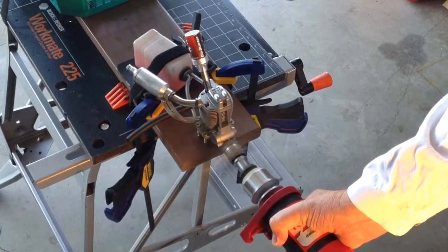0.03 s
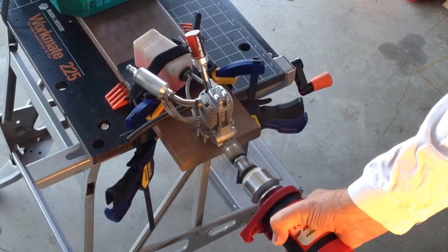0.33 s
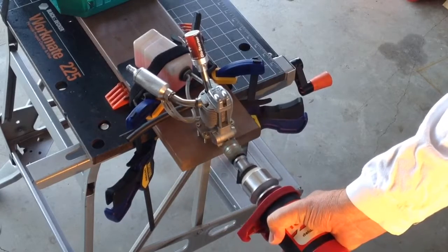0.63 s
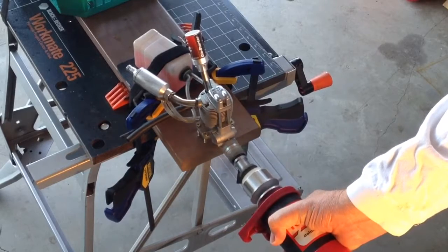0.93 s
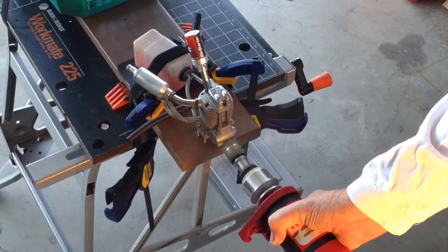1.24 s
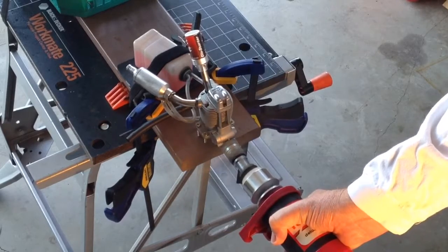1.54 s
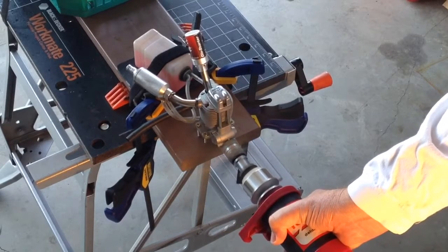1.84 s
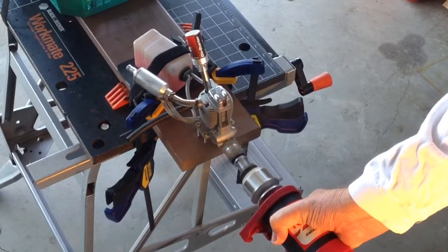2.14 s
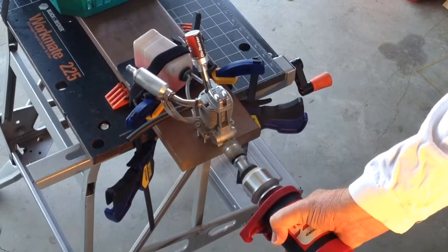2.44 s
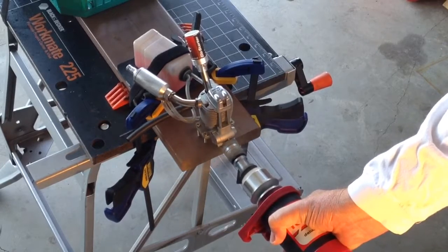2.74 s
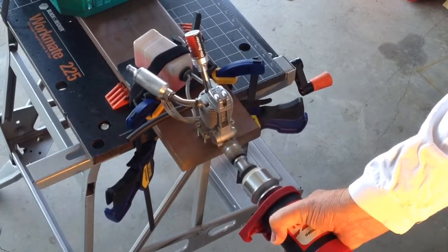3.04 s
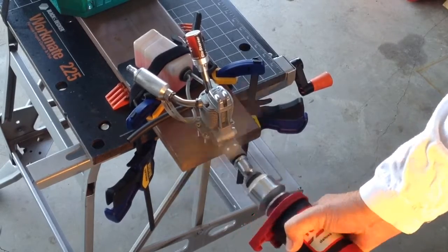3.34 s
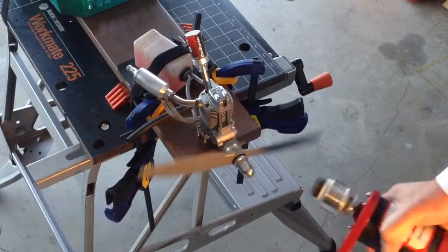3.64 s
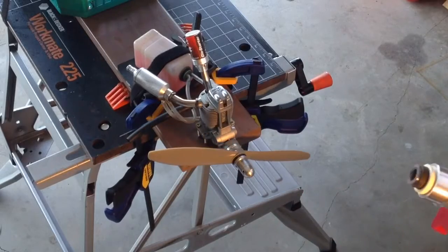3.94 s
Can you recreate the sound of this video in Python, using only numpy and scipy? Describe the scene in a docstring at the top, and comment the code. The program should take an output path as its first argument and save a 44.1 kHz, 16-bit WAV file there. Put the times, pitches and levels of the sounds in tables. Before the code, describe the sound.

An electric starter cranks a small model engine with harsh rattling and squeaks, then it stops.

```python
"""An electric starter cranks a small four-stroke model engine clamped to a workbench; it never fires.
Every cycle thumps the bench, rattles gears and valves, and makes the starter's cone slip and squeak.
The starter is pulled off and the propeller coasts to rest with slowing clacks, a wheeze and a clink.
One microphone, close enough to catch the propeller wash, hears it all over the rumble of a workshop."""
import sys
import numpy as np
from scipy import signal
from scipy.fft import rfft, irfft
from scipy.io import wavfile
from scipy.ndimage import uniform_filter1d, map_coordinates

SR = 44100
rng = np.random.default_rng(int(sys.argv[2]) if len(sys.argv) > 2 else 0)


def wav_out(sig):
    """Save sig, one row per channel (or a flat mono array), as 16-bit PCM at SR to the path in sys.argv[1]."""
    wavfile.write(sys.argv[1], SR, np.round(np.clip(np.atleast_2d(sig).T, -1, 1) * 32767).astype(np.int16))


N = 176400
T = np.arange(N) / SR
CRANKING_HZ, RELEASE_S = 24.2, 3.29  # nominal engine cycles per second; the starter comes off


def amp(db):
    """Decibels to gain."""
    return 10 ** (np.asarray(db) / 20)


def unit(x):
    """Scales to rms 1."""
    return x / np.sqrt(np.mean(x ** 2) + 1e-20)


def read(points, hz):
    """Reads a table on a log-frequency axis."""
    f, value = np.transpose(points)
    return np.interp(np.log(hz + 1), np.log(f), value)


def colour(x, points):
    """Gives x a spectrum that falls away below its first point; rms 1."""
    hz = np.fft.rfftfreq(2 * len(x), 1 / SR)
    gain = amp(read(points, hz)) * np.minimum(hz / points[0][0], 1) ** 2
    return unit(irfft(rfft(x, 2 * len(x)) * gain)[:len(x)])


def add(mix, start_s, sound):
    """Mixes a sound in at start_s."""
    part = mix[max(round(start_s * SR), 0):][:len(sound)]
    part += sound[:len(part)]


def jitter(size, length=N):
    """Noise smoothed over size samples; rms 1."""
    return unit(uniform_filter1d(rng.standard_normal(length), size))


def grains(spread_db):
    """Noise whose level jumps from one tiny impact to the next."""
    return rng.standard_normal(N) * amp(spread_db * jitter(24))


def passes(cycles, phase):
    """Samples at which the engine passes a phase (0-1) of its cycle."""
    return np.flatnonzero(np.diff(np.floor(cycles - phase)) > 0)


def ring(modes, t, wave=np.sin):
    """The decaying modes of a struck body."""
    return sum(amp(db - 60 * t / t60) * wave(2 * np.pi * hz * t) for hz, db, t60 in modes)


# Room tone of the workshop: frequency_hz, level_db
ROOM_TONE = [(20, -22), (60, -11), (115, 5), (200, -16.5), (400, -19.5), (1000, -27), (4000, -27.5),
             (8000, -32), (15000, -36)]
def room_tone():
    """A steady low rumble behind the bench."""
    return amp(-54) * colour(rng.standard_normal(N), ROOM_TONE)


# Reverberation of the workshop: frequency_hz, t60_s
ROOM_DECAY = [(150, .4), (1000, .42), (4000, .36), (9000, .22), (15000, .17)]
def room_echo(x):
    """A short diffuse tail whose treble dies first."""
    hz, t, spectra = signal.stft(rng.standard_normal(SR // 2), SR, nperseg=256)
    tail = signal.istft(spectra * amp(-60 * t / read(ROOM_DECAY, hz)[:, None]), SR, nperseg=256)[1]
    return signal.oaconvolve(x, tail / np.linalg.norm(tail))[:N]


# Gusts reaching the microphone: peak_s, level_db
GUSTS = [(.705, -46), (1.44, -61.5), (2.02, -50), (2.35, -50.5), (2.8, -51)]
# Wind noise on the microphone: frequency_hz, level_db
BUFFET = [(25, -15), (45, 2), (75, -4.5), (130, -11), (400, -73)]
def propeller_wash(effort):
    """Air off the propeller buffets the microphone, with a few brief gusts."""
    gusts = sum(amp(db) * np.exp(-((T - s) / .018) ** 2) for s, db in GUSTS)
    return (amp(-64.5) * effort + gusts) * colour(rng.standard_normal(N), BUFFET)


# Breath of the cylinder: frequency_hz, level_db
WHEEZE = [(300, -8), (1100, 5), (2400, -6), (3500, 5.5), (4300, -1), (5200, -17), (15000, -39.5)]
def wheeze(peak_s=3.68, width_s=.043):
    """The cylinder lets out one last wheeze as the propeller stops."""
    swell = amp(-58.5) / (1 + ((T - peak_s) / width_s) ** 2)
    return swell * colour(rng.standard_normal(N), WHEEZE)


# Modes of the clink: pitch_hz, level_db, t60_s
CLINK_MODES = [(880, -45, .059), (2750, -39, .04), (3420, -45, .055)]
def clink(start_s=3.7, rise_s=.0035):
    """A soft metallic touch as the propeller turns over one last time."""
    t = np.maximum(T - start_s, 0)
    return (1 - np.exp(-t / rise_s)) * ring(CLINK_MODES, t)


# Valve clacks while coasting: start_s, level_db
CLACKS = [(3.2868, -30), (3.331, -22.5), (3.3842, -23.5), (3.4457, -32), (3.4543, -24), (3.5627, -28.5),
          (3.5791, -28.5), (3.6143, -32), (3.7812, -33.5)]
# Noise of one clack: frequency_hz, level_db
CLACK_SPECTRUM = [(300, -1), (1400, 1), (2100, 3), (3000, -2), (5000, -4), (9000, -1), (14500, -1),
                  (16000, -9)]
# Crankcase modes: pitch_hz, level_db, t60_s
CASE_MODES = [(2040, -18, 0.14), (2450, -29, 0.13), (3420, -31, 0.065)]
def valve_clacks(decay_s=.0045):
    """Separate valve clacks ring the crankcase as the engine runs down."""
    out, t = np.zeros(N), T[:SR // 5]
    for start_s, db in CLACKS:
        click = np.exp(-t / decay_s) * colour(rng.standard_normal(len(t)), CLACK_SPECTRUM)
        add(out, start_s, amp(db - 4) * (click + ring(CASE_MODES, t)))
    return out


# Gear tones: multiple_of_cycle_rate
GEAR_ORDERS = [13, 25, 29, 32, 35, 36, 37, 38]
# Housing resonances: centre_hz, width_hz, level_db
HOUSING = [(318, 22, -50), (680, 300, -53), (899, 18, -42.5)]
def gear_whine(cycles, speed):
    """Gear tones locked to the crank swell in the housing resonances and throb twice a cycle."""
    out, knots = np.zeros(N), np.arange(0, T[-1] + .1, .1)
    for order in GEAR_ORDERS:
        pitch_hz = order * speed
        power = sum(amp(db) ** 2 / (1 + (2 * (pitch_hz - hz) / width) ** 2) for hz, width, db in HOUSING)
        waver = np.interp(T, knots, .2 * rng.standard_normal(len(knots)))
        out += np.sqrt(2 * power) * (1 + waver) * np.sin(2 * np.pi * (order * cycles + rng.random()))
    throb = 1 + .5 * np.cos(2 * np.pi * 2 * (cycles - .2))
    return out * (speed / CRANKING_HZ) ** 1.4 * throb


# Drifting pitch of the starter's slipping cone: time_s, pitch_hz
SLIP_PITCH = [(0.0, 9980), (0.53, 10130), (0.57, 9500), (0.71, 10170), (0.78, 9300), (1.11, 9790),
              (1.81, 9130), (1.84, 8520), (2.04, 9800), (2.16, 8920), (2.51, 9440), (2.78, 8040),
              (3.1, 10030), (3.3, 8200)]
# Resonance of the cone: frequency_hz, gain_db
CONE_RESONANCE = [(6500, -47.5), (7800, -14), (8500, -3.5), (10300, -6), (11300, -7), (13000, -7)]
def cone_scrape(sweep_hz=3370, rough_hz=605.5, let_go_s=.02):
    """The cone rubs the spinner in rough rising chirps, about one per crank turn, until pulled off."""
    contact = np.clip((RELEASE_S - T) / let_go_s + .5, 0, 1)
    wander = .37 * uniform_filter1d(jitter(2500), size=900)
    turn = (2 * CRANKING_HZ * T + wander) % 1
    hz = np.interp(T, *np.transpose(SLIP_PITCH)) + sweep_hz * (turn - .5) + rough_hz * jitter(14)
    grip = amp(1.5 * jitter(200))
    chirps = np.sin(np.pi * turn) * grip * np.sin(2 * np.pi * np.cumsum(hz) / SR)
    return amp(-34) * contact * colour(chirps, CONE_RESONANCE)


def squeak(peak_s, db, hz, width_s=.0018, sag_hz_per_s=209000, wobble_hz=640):
    """Stick and slip makes a tiny, rough, falling whistle; returns its start time and sound."""
    t = T[:SR // 80] - T[SR // 160]
    pitch_hz = hz - sag_hz_per_s * t + wobble_hz * jitter(14, len(t))
    envelope = amp(db) / np.cosh(2 * t / width_s)
    return peak_s + t[0], envelope * np.sin(2 * np.pi * np.cumsum(pitch_hz) / SR)


# Loudest squeaks of the cone: time_s, level_db, pitch_hz
LOUD_SQUEAKS = [(0.3074, -10.5, 9500), (0.5823, -9.5, 8800), (0.7077, -7, 10200), (0.7926, -8.5, 8890),
                (0.8335, -13, 8900), (0.874, -10.5, 9150), (0.9153, -21, 8940), (1.038, -9, 10100),
                (1.0785, -11, 10400), (1.099, -13, 9640), (1.2022, -10.5, 9350), (1.243, -7, 9860),
                (1.2838, -6.5, 10100), (1.3256, -6, 9770), (1.367, -3.5, 8720), (1.5522, -8, 9630),
                (1.7379, -12, 9190), (1.7795, -10.5, 9930), (1.8632, -7.5, 8690), (2.0272, -7.5, 9790),
                (2.0694, -8.5, 9640), (2.0876, -10, 8730), (2.11, -8.5, 9780), (2.1927, -8, 8790),
                (2.2353, -9.5, 9620), (2.358, -5.5, 9070), (2.399, -8, 9190), (2.4833, -6, 9800),
                (2.504, -8.5, 8700), (2.6474, -10, 9000), (2.8147, -5.5, 8700), (2.855, -7, 9080),
                (2.8958, -8, 8690), (2.9791, -9, 9470), (2.9994, -11.5, 8690), (3.019, -5, 9770),
                (3.039, -9, 8920), (3.0604, -8, 8740), (3.1004, -7.5, 9720), (3.1417, -6.5, 8740)]
# Slips in every cycle: phase_cycles, level_db
SLIPS = [(0.241, -18), (0.471, -19), (0.722, -11.5)]
def cone_squeaks(cycles, lag_s=.0018, spread_s=.0012, spread_db=2, spread_hz=440):
    """The starter's cone slips at the same crank angles, now and then with a loud squeak."""
    out, loud_s = np.zeros(N), np.array(LOUD_SQUEAKS)[:, 0]
    for s, db, hz in LOUD_SQUEAKS:
        add(out, *squeak(s + lag_s, db + 2, hz))
    for phase, db in SLIPS:
        for s in T[passes(cycles, phase)]:
            if s < RELEASE_S and abs(loud_s - s).min() > .005:
                late, hard, high = rng.standard_normal(3)
                hz = np.interp(s, *np.transpose(SLIP_PITCH)) + spread_hz * high
                add(out, *squeak(s + spread_s * late, db + spread_db * hard, hz))
    resonance = amp(read(CONE_RESONANCE, np.fft.rfftfreq(N, 1 / SR)))
    return irfft(rfft(out) * resonance, N)


# Knocks in every cycle: phase_cycles, decay_cycles, rattle_db, fizz_db
KNOCKS = [(.1, .025, 9.5, -12), (.195, 0.029, 7.5, 11), (.28, .13, 3, 3.5), (.42, 0.038, 4.5, 3.5),
          (.58, 0.097, -7.5, -20), (.66, 0.06, -1.5, -24)]
# Rattle of gears and valve train, close up: frequency_hz, level_db
RATTLE = [(300, 4), (500, 1), (700, -0.5), (870, 1), (1030, -3.5), (1330, 3.5), (1600, -1), (2050, 3.5),
          (2350, 2), (2650, -3), (3100, -0.5), (3600, 1), (4200, -0.5), (5100, -6), (6500, -6.5),
          (8000, -12.5)]
# Treble fizz on top of it: frequency_hz, level_db
FIZZ = [(4000, -14.5), (6500, 2.5), (7900, 1), (9500, 3), (11000, -3), (12500, -6), (14500, -0.5),
        (15500, -12.5)]
def clatter(cycles, effort, rise_cycles=.0058):
    """Gear teeth and valves rattle in bursts; part of the pattern repeats with every cycle."""
    rattle_power, fizz_power = np.ones(N), np.ones(N)
    for phase, decay, rattle_db, fizz_db in KNOCKS:
        age = (cycles - phase) % 1
        burst = np.exp(-age / decay) * (1 - np.exp(-age / rise_cycles))
        rattle_power += burst * amp(rattle_db) ** 2
        fizz_power += burst * amp(fizz_db) ** 2
    teeth = uniform_filter1d(rng.standard_normal(round(SR / CRANKING_HZ)), size=14, mode="wrap")
    repeating = map_coordinates(teeth, [cycles % 1 * len(teeth)], mode="grid-wrap")
    blend = np.clip(.28 * effort ** 2, 0, 1)
    impacts = np.sqrt(blend) * repeating + np.sqrt(1 - blend) * unit(grains(spread_db=2))
    rattle = colour(impacts * np.sqrt(rattle_power) * effort ** 2, RATTLE)
    fizz = colour(grains(spread_db=5) * np.sqrt(fizz_power) * effort ** 12, FIZZ)
    return amp(-32) * rattle + amp(-35) * fizz


# Modes of the engine mount and workbench: pitch_hz, level_db, t60_s
BENCH_MODES = [(96.8, -48.5, 0.54), (147, -39.5, 0.25), (166.2, -36.5, 0.19), (196.6, -39.5, 0.18),
               (236.5, -41.5, 0.24), (316, -75, .1), (326.2, -34, 0.17), (393.4, -30.5, 0.42),
               (399.6, -38.5, 0.45), (430, -45, 0.18), (614, -67, .07), (770, -71, 0.028)]
def compression_thumps(cycles, effort, jolt_db=-51, spread_db=1):
    """One compression thump a cycle, and lesser random jolts, ring the mount and the bench."""
    strokes = passes(cycles, phase=.21)
    push = amp(jolt_db) * rng.standard_normal(N) * effort
    push[strokes] += amp(spread_db * rng.standard_normal(len(strokes)))
    bench = ring(BENCH_MODES, T[:SR // 2], np.cos)
    band = signal.butter(2, [71.4, 1667], "band", fs=SR, output="sos")
    return signal.sosfilt(band, signal.oaconvolve(push * effort ** 1.37, bench)[:N])


# Engine speed under the starter: time_s, cycle_rate_hz
CRANKING = [(0, 23.52), (.15, 23.43), (.3, 23.61), (.5, 23.46), (.75, 23.91), (.98, 24.68), (1.2, 24.18),
            (1.4, 24.42), (1.6, 24.02), (1.85, 24.34), (2.1, 24.13), (2.35, 24.2), (2.6, 23.94),
            (2.8, 24.42), (3.0, 24.32), (3.3, 24.45)]
# Engine speed running down: time_s, cycle_rate_hz
COASTING = [(3.33, 20), (3.39, 16.7), (3.45, 13), (3.56, 5.5), (3.7, 4.8), (3.8, 3.2), (3.85, 0)]
# Level of clatter and scrape, steady while cranking, the rattle lifted while coasting: time_s, gain_db
CLATTER_LEVEL = [(0, -0.5), (.4, 0.1), (.65, 0), (.9, 0), (1.7, 0), (2.4, 0), (3.0, 0), (3.28, -0.5),
                 (3.5, 5.5)]
def scene():
    """The engine is cranked, then coasts, on the bench in front of a single close microphone."""
    speed = np.interp(T, *np.transpose(CRANKING + COASTING))
    cycles, effort = np.cumsum(speed) / SR, speed / CRANKING_HZ
    gain = amp(np.interp(T, *np.transpose(CLATTER_LEVEL)))
    metal = gain * clatter(cycles, effort) + valve_clacks() + wheeze() + clink()
    cone = gain * cone_scrape() + cone_squeaks(cycles)
    # The cone beams its treble at the microphone, so little of it reaches the room.
    echo = room_echo(amp(-8.5) * metal + amp(-13) * cone)
    engine = compression_thumps(cycles, effort) + gear_whine(cycles, speed) + metal
    return (engine + cone + echo + propeller_wash(effort) + room_tone())[None]


def record(dry, edge_hz=15380):
    """The recorder's band limit."""
    lowpass = signal.firwin(1201, edge_hz, window=("kaiser", 8), fs=SR)
    return signal.oaconvolve(dry, lowpass[None], "same")


dry = scene()
out = record(dry)
wav_out(out)
```